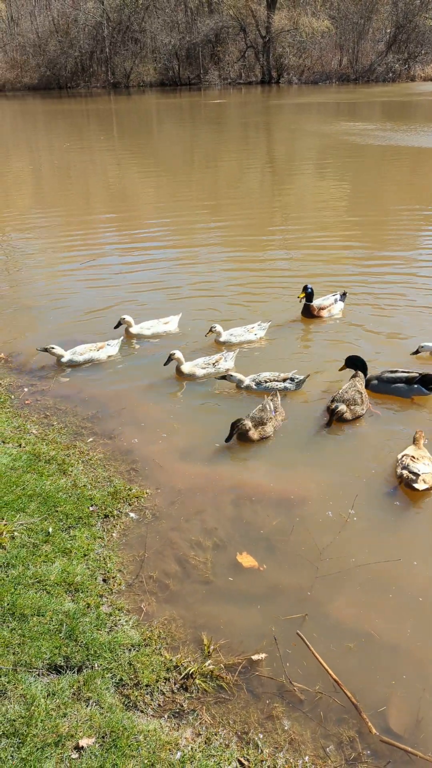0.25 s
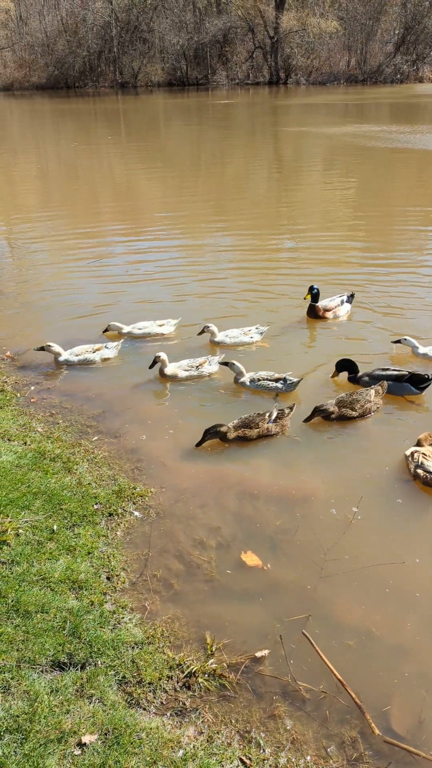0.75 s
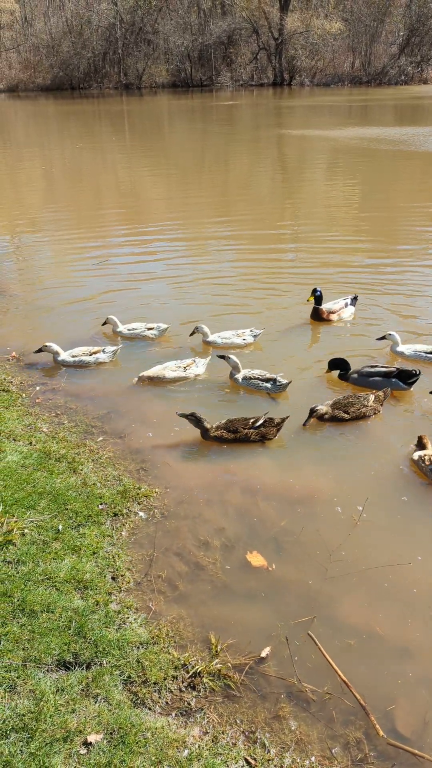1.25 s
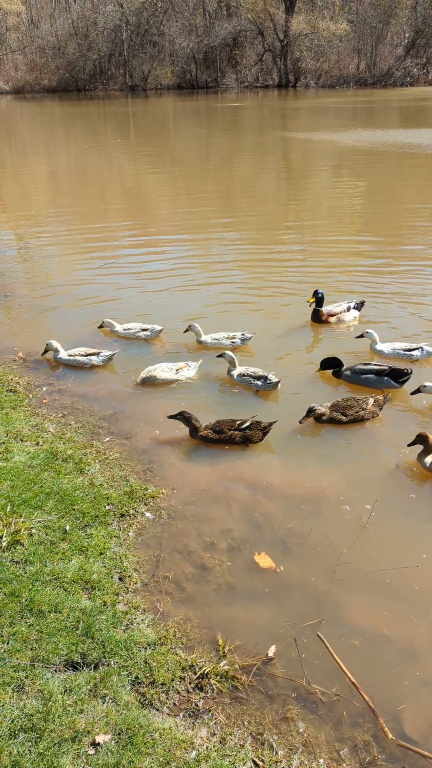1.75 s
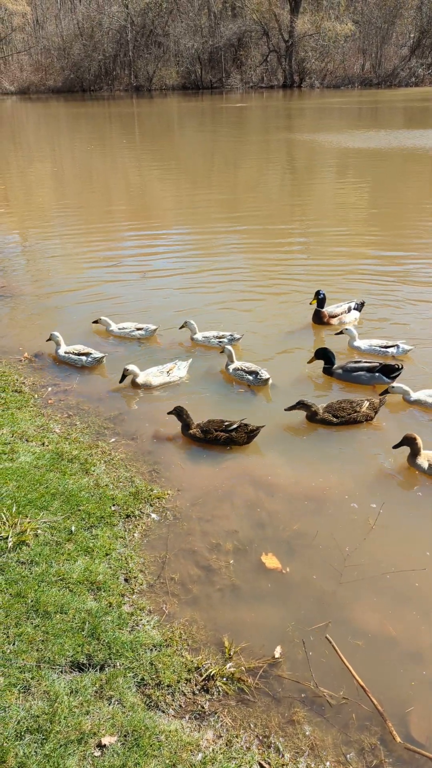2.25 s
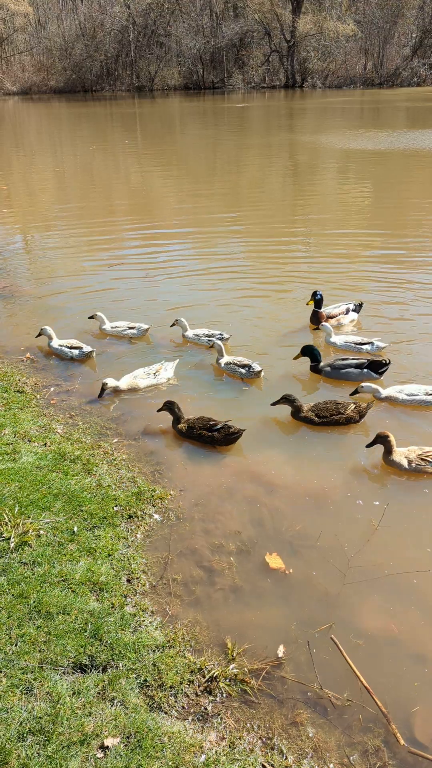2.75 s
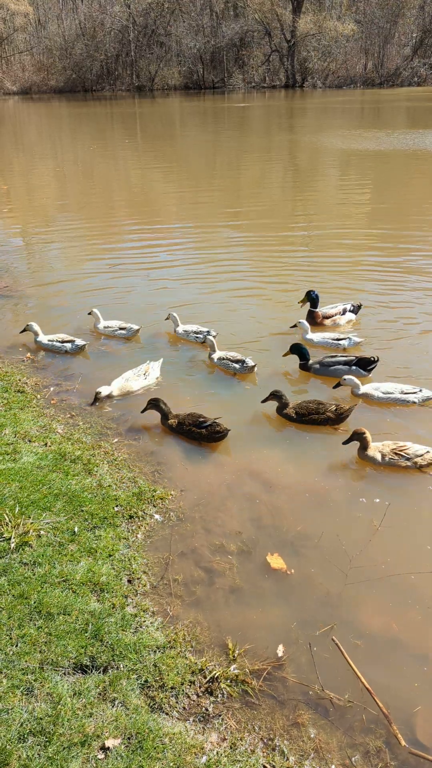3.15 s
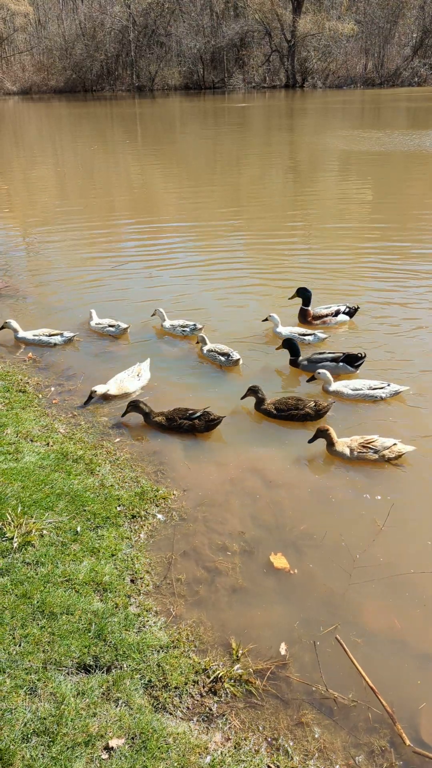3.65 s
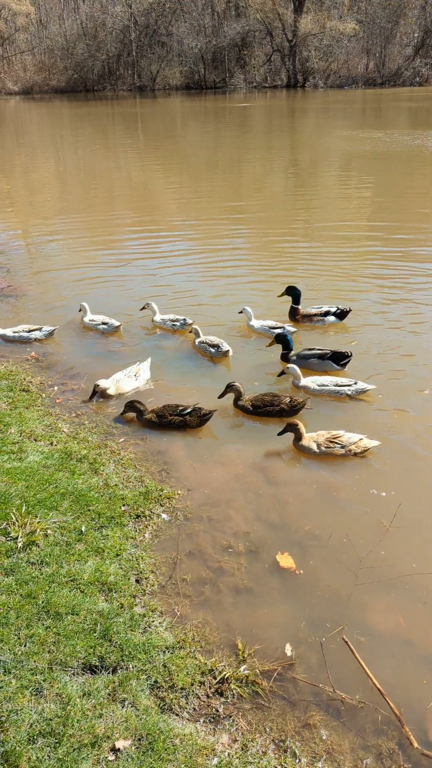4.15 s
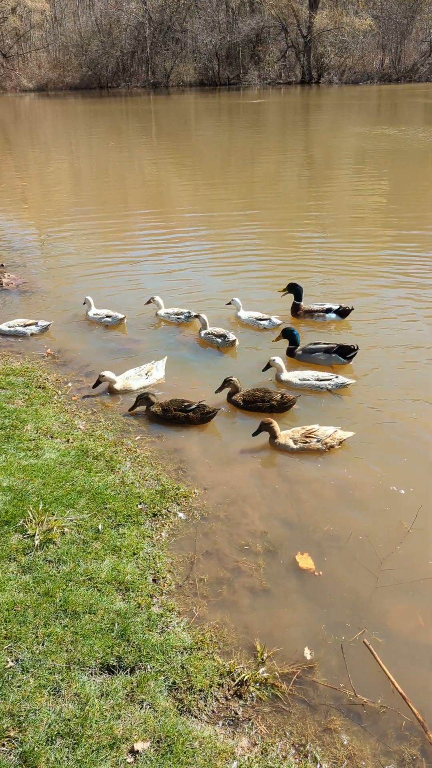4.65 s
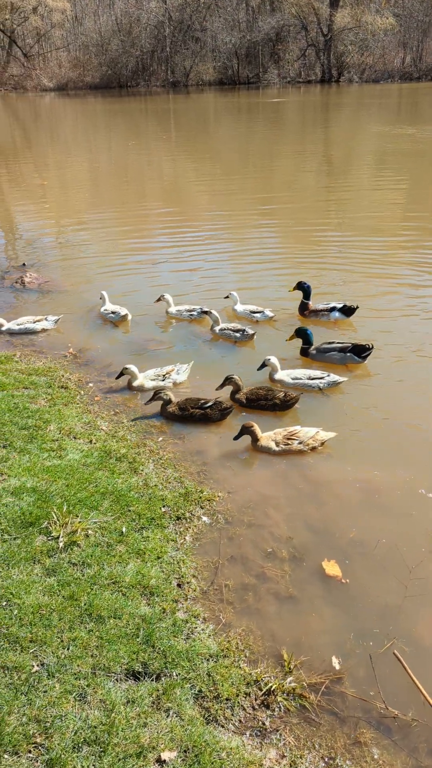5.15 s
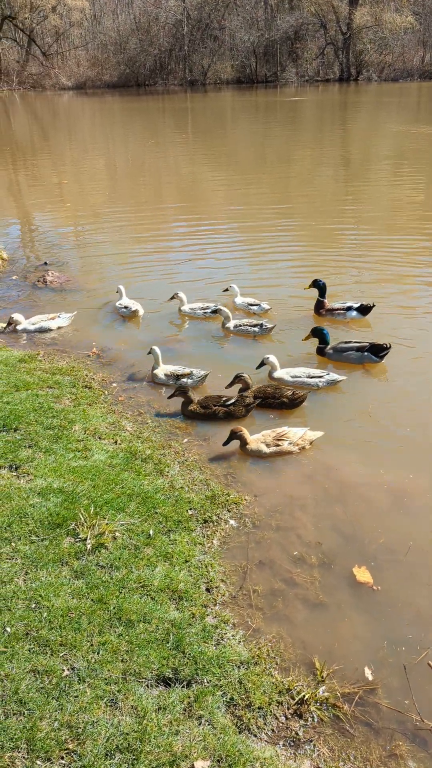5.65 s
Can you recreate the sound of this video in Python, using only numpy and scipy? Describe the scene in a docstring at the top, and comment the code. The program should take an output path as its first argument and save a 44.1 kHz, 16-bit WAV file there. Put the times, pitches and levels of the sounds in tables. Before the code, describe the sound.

A duck gives seven rasping quacks on a pond, with small drips of paddling and light wind on the microphone.

```python
"""A duck on a muddy pond gives seven rasping quacks, the last ones weaker and duller.
Each flap of its voice box (the syrinx) makes a short upward chirp. In every quack the bill opens,
effort raises level, flap rate and rasp to a crest, and the pitch falls as the bill shuts.
The flock paddles with small drips and ticks; light wind bumps the microphone
over a faint hum and low background noise that swells with the quacks."""
import sys
import numpy as np
from scipy import signal
from scipy.fft import rfft, irfft
from scipy.io import wavfile

SR = 44100
rng = np.random.default_rng(int(sys.argv[2]) if len(sys.argv) > 2 else 0)


def wav_out(sig):
    """Save sig, one row per channel (or a flat mono array), as 16-bit PCM at SR to the path in sys.argv[1]."""
    wavfile.write(sys.argv[1], SR, np.round(np.clip(np.atleast_2d(sig).T, -1, 1) * 32767).astype(np.int16))


N = 260190


def from_db(db):
    """Turn decibels into a gain."""
    return 10 ** (np.asarray(db) / 20)


def rms_one(x):
    """Scale a signal to a power of 1."""
    return x / np.sqrt(np.mean(x ** 2) + 1e-20)


def pan(db):
    """Left and right gains, with the left louder by db."""
    return from_db(np.vstack([db / 2, -db / 2]))


def in_time(points, t):
    """Read a curve at the times t."""
    return np.interp(t, *np.transpose(points))


def at_hz(points, hz):
    """Read a curve along a log-frequency axis."""
    f, value = np.transpose(points)
    return np.interp(np.log(np.maximum(hz, 1)), np.log(f), value)


def drift(rate_hz):
    """A smooth random wander, about 1 in size."""
    step, warm_up = 40, 2000
    r = np.exp(-2 * np.pi * step * rate_hz / SR)
    slow = signal.lfilter([1], [1, -2 * r, r * r], rng.standard_normal(N // step + warm_up + 2))
    slow = rms_one(slow[warm_up:])
    return np.interp(np.arange(N) / step, np.arange(len(slow)), slow)


def resonate(x, hz, width_hz):
    """Ring at one pitch, with a gain of 1 at the peak."""
    r = np.exp(-np.pi * width_hz / SR)
    feedback = [1, -2 * r * np.cos(2 * np.pi * hz / SR), r * r]
    return signal.lfilter(np.array([1, 0, -1]) * (1 - r * r) / 2, feedback, x + 1e-18)


def cavity(x, modes):
    """A hollow space rings at several pitches, added with alternating signs."""
    return sum((-1) ** k * from_db(db) * resonate(x, hz, width)
               for k, (hz, width, db) in enumerate(modes))


def band(x, low_hz, high_hz, order=2):
    """Keep the sound between two frequencies."""
    return signal.sosfilt(signal.butter(order, [low_hz, high_hz], "band", fs=SR, output="sos"), x)


def coloured_noise(colour, likeness):
    """Stereo noise with a given spectrum; a likeness of 1 makes both ears the same."""
    hz = np.arange(N // 2 + 1) * SR / N
    mid, side = rfft(rng.standard_normal((2, N))) * from_db(at_hz(colour, hz)) * (hz > 20)
    alike = at_hz(likeness, hz)
    return rms_one(irfft(np.sqrt(1 + alike) * mid + np.sqrt(1 - alike) * side * [[1], [-1]], N))


def with_swells(base_db, swells, t):
    """A level in dB with bell-shaped swells added to its power."""
    extra = sum(from_db(db) ** 2 * np.exp(-((t - s) / width_s) ** 2) for s, db, width_s in swells)
    return 10 * np.log10(from_db(base_db) ** 2 + extra)


def puff(age, peak_s, sharpness):
    """A swell that peaks at peak_s and then dies away."""
    return (age / peak_s * np.exp(1 - age / peak_s)) ** sharpness


def eddy(hz, width_hz):
    """Swirling air: a narrow band of noise that follows a moving pitch."""
    smooth = signal.butter(2, width_hz / 2, fs=SR, output="sos")
    a, b = signal.sosfilt(smooth, rng.standard_normal((2, SR)))[:, -len(hz):]
    phase = 2 * np.pi * np.cumsum(hz) / SR
    return rms_one(a * np.sin(phase) + b * np.cos(phase))


# the background noise's level, with swells timed to the quacks, before gain_db: t/s, level/dB
BACKGROUND_LEVELS = [(0, -68), (.33, -64), (.75, -70.5), (1.15, -62), (1.65, -65), (1.95, -58), (2.33, -67),
                     (2.65, -61.5), (3.55, -65), (4.1, -62), (5.9, -59.5)]
# its mix of low and high sound: f/Hz, relative level/dB
BACKGROUND_COLOUR = [(59, -56), (100, -16), (146, 0), (173, -12), (205, -1.5), (321, -15), (477, -9.5),
                     (872, -9), (1920, -15), (2190, -21), (3580, -26), (4740, -35.5), (5950, -28.5),
                     (9000, -54), (11700, -108), (19800, -120)]
# how alike it is in the two ears: f/Hz, likeness/0-1
BACKGROUND_LIKENESS = [(100, 0.98), (250, 1), (1000, 0.58), (2500, 0), (6000, 0.1), (12000, 0)]


def background_noise(t, gain_db=4):
    """Low background noise that swells with the quacks, sinks between them and slowly grows."""
    level_db = in_time(BACKGROUND_LEVELS, t) + gain_db + .5 * drift(12)
    return from_db(level_db) * coloured_noise(BACKGROUND_COLOUR, BACKGROUND_LIKENESS)


# the tones of a distant machine: f/Hz, level/dB
HUM_TONES = [(147, -71), (206, -66), (236, -77.5)]


def machine_hum(waver_db=.49, waver_hz=1.58):
    """A machine hums with three faint tones that waver in level and pitch."""
    hum = np.zeros(N)
    for hz, db in HUM_TONES:
        gain = from_db(db + waver_db * drift(5.2))
        hum += gain * np.sin(2 * np.pi * np.cumsum(hz + waver_hz * drift(4.9)) / SR)
    return hum


# how loud water and grass are, before gain_db: t/s, level/dB
RUSTLE_LEVELS = [(0, -73.5), (0.7, -81.5), (2, -76), (3.1, -75.5), (3.65, -81), (4.7, -81), (5.1, -85),
                 (5.9, -83.5)]
# swishes of paddling on top, before gain_db: t/s, peak level/dB, half width/s
PADDLE_SWISHES = [(0.96, -71, 0.14), (1.32, -74.5, 0.057), (1.72, -76.5, 0.078), (2.32, -94, .08),
                  (2.94, -75.5, 0.043), (3.9, -78.5, 0.15), (4.85, -78, 0.21)]
# the rustle's mix of low and high sound: f/Hz, relative level/dB
RUSTLE_SPECTRUM = [(1000, -3), (2500, 13), (4500, 9.5), (6000, 11.5), (8000, 8.5), (10500, 2), (12200, 5),
                   (13500, 5), (15500, 4)]


def rustle(t, gain_db=7, ticks_per_s=42, tick_db=-1, tick_fade_s=.064):
    """Water and grass make a fine, grainy hiss with tiny ticks in it."""
    kicks = (rng.random(N) < ticks_per_s / SR) * np.minimum(rng.exponential(1, N), 3)
    decay = from_db(-60 / (tick_fade_s * SR))
    ticks = from_db(tick_db) * signal.lfilter([1], [1, -decay], kicks + 1e-18)
    level_db = with_swells(in_time(RUSTLE_LEVELS, t), PADDLE_SWISHES, t) + gain_db + drift(70)
    hiss = coloured_noise(RUSTLE_SPECTRUM, likeness=[(2000, .21), (9000, .062)])
    return from_db(level_db) * (1 + ticks) * hiss


# gusts on top of the breeze, before gain_db: t/s, peak level/dB, half width/s
WIND_GUSTS = [(0.57, -52.5, 0.11), (1.1, -63, 0.15), (1.78, -65.5, 0.6), (2.24, -46.5, 0.021),
              (2.52, -68, 0.24), (2.88, -60, 0.085), (3.42, -58.5, 0.13), (4.38, -59, 0.057)]
# the wind's mix of low and high sound: f/Hz, relative level/dB
WIND_SPECTRUM = [(25, -70), (40, -13), (55, -3), (90, -0.5), (150, -7.5), (250, -16.5), (400, -27),
                 (1000, -88)]
# single bumps of wind, before bump_db: t/s, peak level/dB
WIND_BUMPS = [(0.442, -30), (0.537, -41), (0.62, -40), (2.225, -44), (2.238, -34.5), (3.375, -42)]


def wind(t, breeze_db=-60.5, breeze_db_per_s=-1.37, gain_db=.5, lumpy_db=2.5, bump_hz=105, bump_db=-3):
    """A dying breeze hits the microphone with lumpy low noise and a few short bumps."""
    level_db = with_swells(breeze_db + breeze_db_per_s * t, WIND_GUSTS, t)
    gain = from_db(level_db + gain_db + lumpy_db * drift(8.5))
    air = gain * coloured_noise(WIND_SPECTRUM, likeness=[(50, .6), (200, .11)])
    for start_s, peak_db in WIND_BUMPS:
        age = np.maximum(t - start_s, 0)
        phase = 2 * np.pi * bump_hz * rng.uniform(.88, 1.2) * age
        thud = np.sin([phase, phase + 1.65])  # left and right are out of step
        air += from_db(peak_db + bump_db) * puff(age, .006, 6.3) * thud
    return band(air, 28, 3000) * pan(db=-3.5)


# drips from the paddling flock: t/s, tick/dB, plop/dB, spray/dB, left minus right/dB
FLOCK_DRIPS = [(0.665, -59, -56.5, -75, 4), (0.6874, -54.5, -63, -77, -1.5), (1.2432, -44, -53, -58, -5.5),
               (1.2514, -37.5, -58, -53, -10), (1.304, -48.5, -36, -56, -4), (1.479, -52, -61, -51, -6),
               (1.8308, -52, -45.5, -40, -4), (2.2169, -51, -62, -53, -6), (2.287, -59, -58, -55, -0.5),
               (2.6337, -46, -39, -48, -7), (2.798, -54, -71, -48.5, 4), (2.9865, -39.5, -62, -50, -8),
               (3.023, -51.5, -76, -55, -9), (3.039, -54, -73, -56, -0.5), (3.373, -55, -45, -51, 5),
               (4.076, -60, -50, -50.5, 8), (4.102, -50, -63, -66, -23), (5.654, -58, -70, -63, 2)]
# how plop, tick and spray ring, one row each: f/Hz, width/Hz, added level/dB
DRIP_RINGS = [(1700, 500, 3), (6000, 800, 0), (12500, 4500, 3)]


def drips(splash_db=-24, splash_fade_s=.023):
    """Each drip is a sharp hit and a tiny splash that ring as a plop, a tick and high spray."""
    out, t = np.zeros((2, N)), np.arange(SR // 10) / SR
    for start_s, tick_db, plop_db, spray_db, pan_db in FLOCK_DRIPS:
        hit = (t == 0) + rng.standard_normal(len(t)) * from_db(splash_db - 60 * t / splash_fade_s)
        start = int(start_s * SR)
        for db, (hz, width, added_db) in zip((plop_db, tick_db, spray_db), DRIP_RINGS):
            ring = resonate(resonate(hit, hz, width), hz, 2 * width)
            out[:, start:start + len(t)] += from_db(db + added_db) * ring / np.abs(ring).max() * pan(pan_db)
    return out


def pond_echoes(x, near_db=-14, near_fade_s=.091, far_db=-29, far_fade_s=.22):
    """Quick echoes come off water and bank, then a faint dull wash from the trees."""
    t = np.arange(SR) / SR
    near, far = rng.standard_normal((2, 2, SR))
    near = rms_one(near * from_db(-60 * t / near_fade_s) * (t > .002))
    far = rms_one(band(far, 360, 2100) * from_db(-60 * t / far_fade_s) * (t > .02))
    echoes = (from_db(near_db) * near + from_db(far_db) * far) / np.sqrt(SR)
    return x + signal.fftconvolve(x[None], echoes, axes=1)[:, :N]


# which ear gets more of each pitch of the quacks: f/Hz, left minus right/dB
EAR_BALANCE = [(1000, 0.5), (2200, 3.5), (2700, -1), (3300, 2.5), (4000, -9), (4600, -2), (5300, -1),
               (6200, -2), (7000, -11), (9000, 9)]
# the duck swims about, a little to the right: t/s, left minus right/dB
DUCK_PAN = [(0.2, -2.7), (1.9, -2.2), (3.3, -3), (4, -4.2), (4.7, -2.5)]


def at_ears(x, t, right_lag_s=.000045):
    """Each ear hears the duck with its own tone colour, the right one a moment later."""
    left, right = rfft(x)
    hz = np.arange(len(left)) * SR / N
    shade = from_db(at_hz(EAR_BALANCE, hz) / 2)
    lag = np.exp(-2j * np.pi * hz * right_lag_s)
    return pan(in_time(DUCK_PAN, t)) * irfft(np.array([left * shade, right / shade * lag]), N)


def evened(x):
    """Hold the power steady over a few flaps, so that effort alone sets the level."""
    window = signal.windows.hann(SR // 20)
    power = signal.fftconvolve(x * x, window / window.sum(), "same")
    return x / np.sqrt(np.abs(power) + 1e-12)


def windpipe(x, t, round_trip_s=.001503, stretch_per_s=7.25, closing_s=.0861):
    """Each pulse echoes once in the windpipe; the trip grows as the quack ends, so its tones slide down."""
    trip_s = round_trip_s * np.exp(stretch_per_s * np.maximum(t - t[-1] + closing_s, 0))
    return x + .5 * np.interp(t - trip_s, t, x)


def effort(rhythm, voice, hold_s=.02, catch_width_s=.025, slowing_s=.06, rest_per_s=61):
    """The bill opens, effort grows to a crest with a brief catch on the way, and the bill shuts."""
    start_s, rise_s, first_per_s, top_per_s = rhythm
    open_s, close_s, crest_db, swell_db, top_hz, open_drop, rasp_db, hiss_db, catch_s, catch_db = voice
    t = np.arange(int((rise_s + close_s) * SR)) / SR
    shut = np.interp(t, [0, open_s], [1, 0])
    slack = np.interp(t, [open_s, rise_s], [1, 0])
    closing = np.interp(t, [rise_s + hold_s, rise_s + close_s], [0, 1])
    catch = np.exp(-((t - catch_s) / catch_width_s) ** 2)
    # away from the crest the voice is quieter, lower, smoother and less hissy
    level_db = crest_db - 20.5 * shut - swell_db * slack - catch_db * catch - 27 * closing
    drop = np.interp(t, [0, 1.25 * open_s], [open_drop, 0]) + .07 * slack + .48 * closing ** 2
    rasp_db = rasp_db - 9.5 * slack - 16 * closing
    hiss_db = hiss_db - 3.5 * slack - 14 * closing
    flaps_per_s = np.interp(t - rise_s, [-rise_s, 0, hold_s, slowing_s],
                            [first_per_s, top_per_s, top_per_s, rest_per_s])
    return start_s + t, level_db, top_hz * (1 - drop), rasp_db, hiss_db, flaps_per_s


def syrinx(t, flaps_per_s, throat_hz, rasp_db, jitter=.036, shimmer_db=.6, pitch_scatter=.05):
    """The voice box flaps; each flap makes a rising chirp with its own timing, force and pitch."""
    early, weak, sharp, steep = rng.standard_normal((64, 4)).T
    cycles = 1 + np.cumsum(flaps_per_s) / SR
    flap = (cycles + jitter * np.interp(cycles, np.arange(len(early)), early)).astype(int)
    age = t - t[np.searchsorted(flap, flap)]  # time since this flap began
    force = from_db(-shimmer_db * weak[flap])
    pitch_hz = throat_hz * (1 + pitch_scatter * sharp[flap])
    # a hard rasp climbs steeply; a soft flap gives a longer, purer chirp
    climb_per_s = 210 * from_db(.7 * (rasp_db + 9.5) + 1.5 * steep[flap])
    peak_s = .0013 * from_db(-.3 * np.minimum(rasp_db + 10, 0))
    chirp_hz = pitch_hz * np.maximum(1 + climb_per_s * (age - peak_s), .5)
    tone = np.sin(2 * np.pi * np.cumsum(chirp_hz) / SR)
    return age, force, pitch_hz, tone, tone * puff(age, peak_s, 5.5)


# the pitches at which the throat rings: f/Hz, width/Hz, relative level/dB
THROAT_RINGS = [(1389, 74, -4.5), (1715, 99, 5), (2108, 64, -5.5), (2630, 314, 1)]


def throat(t, age, force, pitch_hz, chirps, direct_db=-6):
    """The chirps ring the throat, and swirling air keeps it sounding between flaps."""
    swirl = .23 * eddy(pitch_hz, width_hz=900) * (puff(age, .003, 2.6) + .24)
    source = force * (chirps + swirl)
    ringing = from_db(direct_db) * source + cavity(source, THROAT_RINGS)
    return evened(band(windpipe(ringing, t), 900, 3300, order=3))


# the pitches at which the mouth rings: f/Hz, width/Hz, relative level/dB
MOUTH_RINGS = [(3234, 176, 15), (4050, 160, 5.5), (4550, 2500, -4)]


def mouth_rasp(t, age, force, pitch_hz, tone, swirl_db=-3):
    """Bursts of tone and swirling air ring the mouth, rising and falling with the throat's pitch."""
    burst = force * puff(age, .0021, 3.2)
    swirl = (burst + .19) * from_db(swirl_db) * eddy(1.58 * pitch_hz, width_hz=800)
    ringing = cavity(burst * tone + swirl, MOUTH_RINGS)
    return evened(band(windpipe(ringing, t), 3260, 5800))


# the pitches at which the open bill rings: f/Hz, width/Hz, relative level/dB
BILL_RINGS = [(5400, 3200, 8.5), (6500, 480, 12), (6700, 340, -6)]


def bill_hiss(age, force, pitch_hz):
    """A puff of hiss passes through the bill after each flap."""
    swirl = force * eddy(2.4 * pitch_hz, width_hz=1400) * (puff(age, .0032, 2.4) + .22)
    return evened(band(cavity(swirl, BILL_RINGS), 4500, 7200, order=3))


def quack(rhythm, voice, low_breath_db=-20, high_breath_db=-13):
    """One quack: the flapping voice box drives throat, mouth and bill, with puffs of breath."""
    t, level_db, throat_hz, rasp_db, hiss_db, flaps_per_s = effort(rhythm, voice)
    age, force, pitch_hz, tone, chirps = syrinx(t, flaps_per_s, throat_hz, rasp_db)
    sound = throat(t, age, force, pitch_hz, chirps)
    sound += from_db(rasp_db) * mouth_rasp(t, age, force, pitch_hz, tone)
    sound += from_db(hiss_db) * bill_hiss(age, force, pitch_hz)
    breath = force * rng.standard_normal(SR)[:len(t)] * (puff(age, .0077, .85) + .22)
    sound += from_db(low_breath_db) * evened(resonate(band(breath, 240, 1700), hz=850, width_hz=550))
    sound += from_db(hiss_db + high_breath_db) * evened(band(breath, 7000, 16400))
    out, start = np.zeros(N), int(t[0] * SR)
    out[start:start + len(t)] = from_db(level_db) * sound * signal.windows.tukey(len(t), .04)
    return out


# the timing of each quack: start t/s, time to the crest/s, first flap rate/Hz, crest flap rate/Hz
QUACK_RHYTHMS = [(0.0455, .254, 65.9, 97.1), (0.8565, .237, 65.6, 92.6), (1.689, .224, 69.7, 88.6),
                 (2.3815, .245, 66.7, 92.8), (3.086, .231, 68, 92.2), (3.7585, .245, 67.6, 90.9),
                 (4.5075, .213, 68, 86.9)]
# the voice of each quack: opening time/s, closing time/s, crest level/dB, swell up to it/dB,
# throat f/Hz, pitch drop at the start/0-1, rasp and hiss (each against the level)/dB,
# time from the start to the catch/s, dip at the catch/dB
QUACK_VOICES = [(.07, 0.079, -38.5, 10.5, 2750, .48, -2.5, -9.5, 0.045, -1),
                (.078, 0.081, -41, 6.5, 2750, .36, -1, -10, 0.1, 2.5),
                (.058, 0.073, -39.5, 7, 2600, 0.4, -6, -11, 0.11, 2.5),
                (0.068, 0.078, -38.5, 7, 2580, .22, -7.5, -10.5, 0.127, 2),
                (.062, 0.076, -40.5, 6.5, 2365, 0.4, -8.5, -11.5, 0.11, 0.5),
                (.06, .093, -43, 7.5, 2236, .22, -13, -17.5, 0.094, 3.5),
                (0.037, 0.067, -44, 6, 2345, .33, -12, -17.5, 0.049, 6)]


def duck(t):
    """Seven quacks echo around the pond and reach the two ears."""
    quacks = sum(quack(rhythm, voice) for rhythm, voice in zip(QUACK_RHYTHMS, QUACK_VOICES))
    return at_ears(pond_echoes(quacks), t)


def scene():
    """The calling duck, the paddling flock and the open air."""
    t = np.arange(N) / SR
    return duck(t) + drips() + wind(t) + background_noise(t) + rustle(t) + machine_hum()


def record(dry):
    """The highest treble is cut off steeply."""
    cutoff_hz = 16050
    return signal.sosfilt(signal.ellip(10, .2, 70, cutoff_hz, fs=SR, output="sos"), dry)


dry = scene()
out = record(dry)
wav_out(out)
```